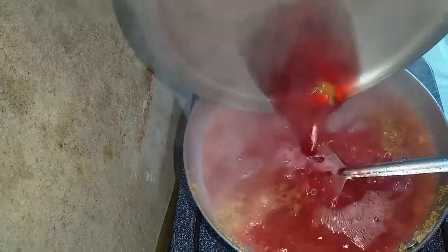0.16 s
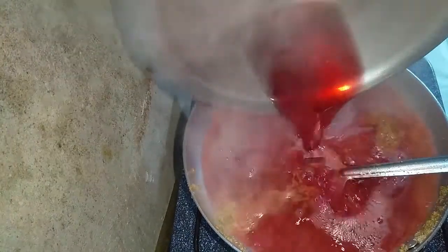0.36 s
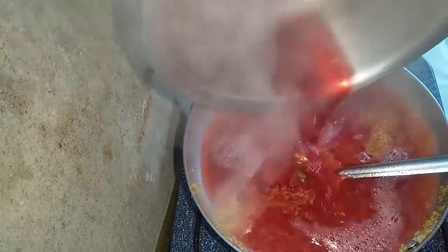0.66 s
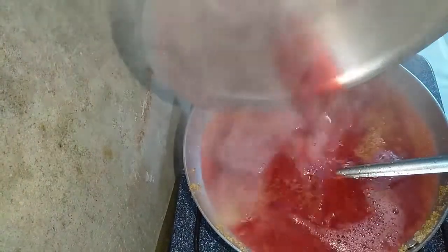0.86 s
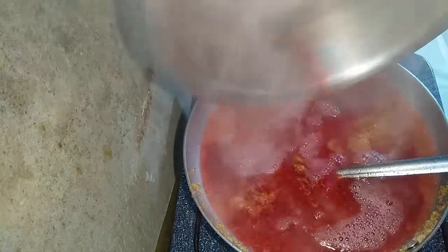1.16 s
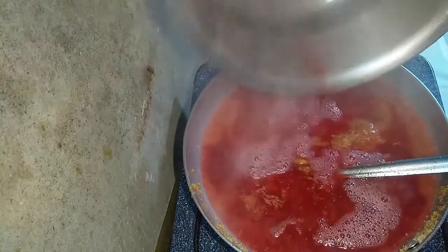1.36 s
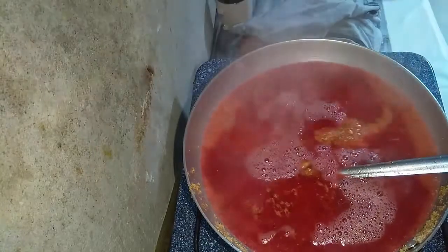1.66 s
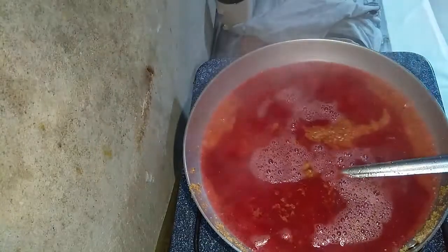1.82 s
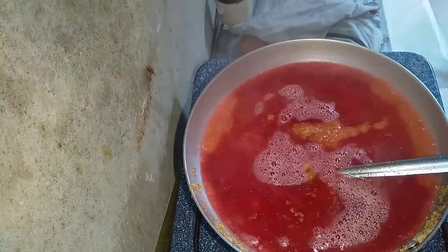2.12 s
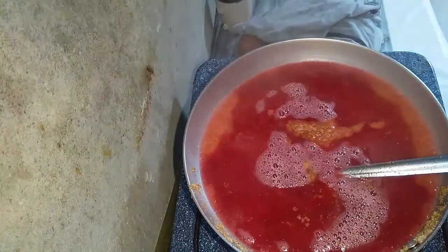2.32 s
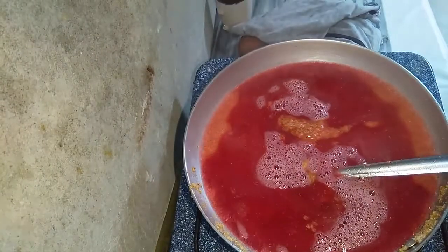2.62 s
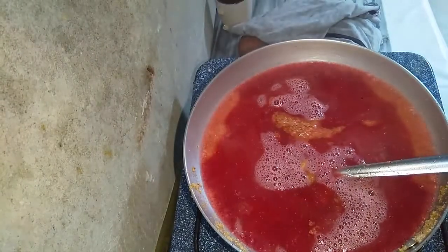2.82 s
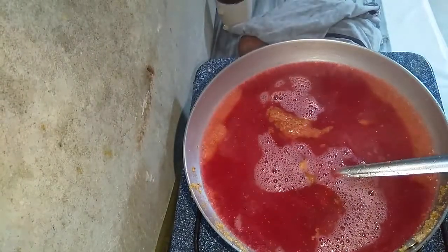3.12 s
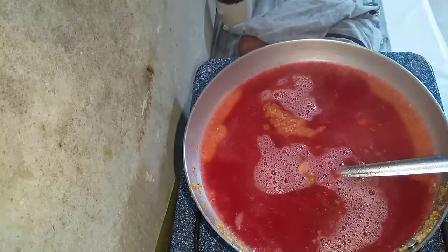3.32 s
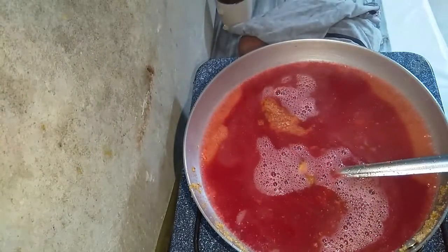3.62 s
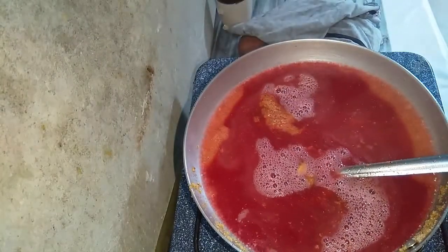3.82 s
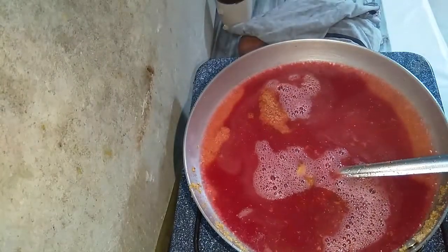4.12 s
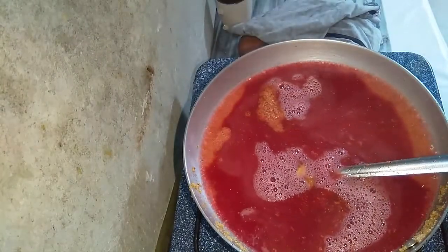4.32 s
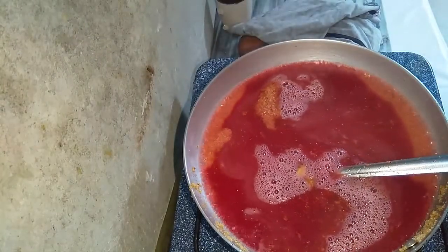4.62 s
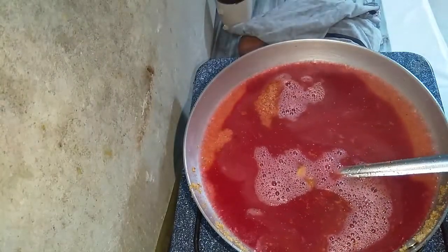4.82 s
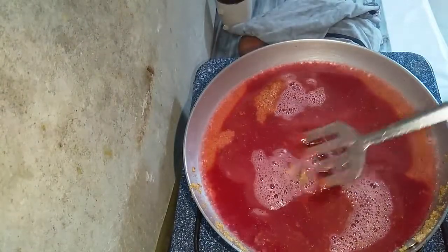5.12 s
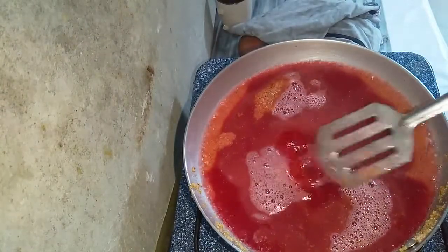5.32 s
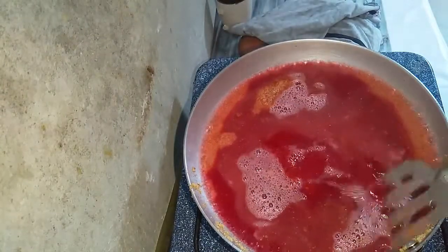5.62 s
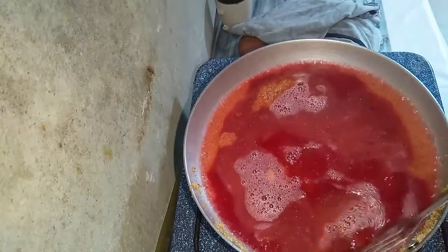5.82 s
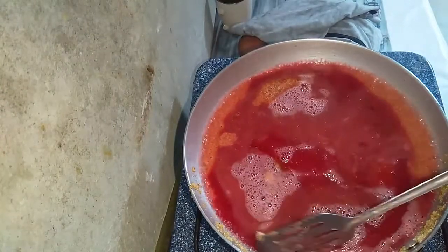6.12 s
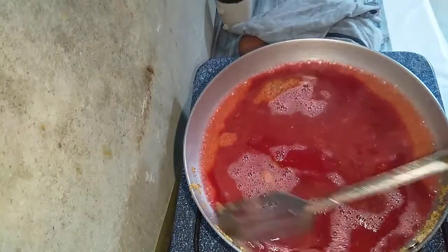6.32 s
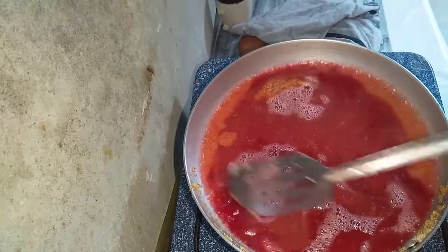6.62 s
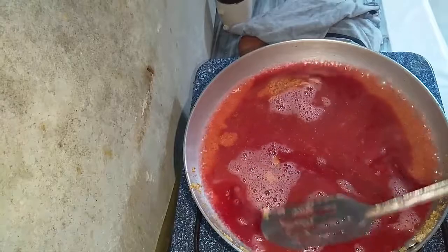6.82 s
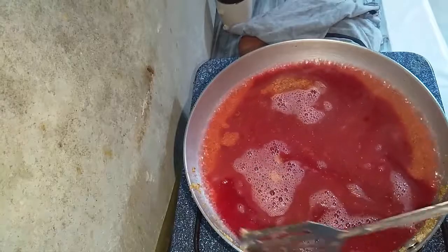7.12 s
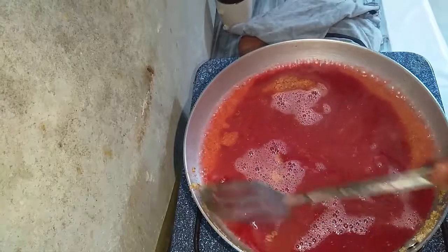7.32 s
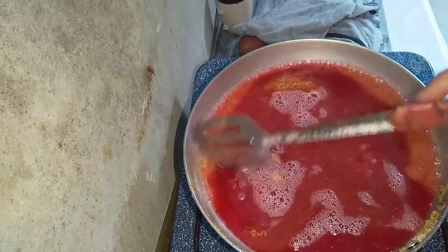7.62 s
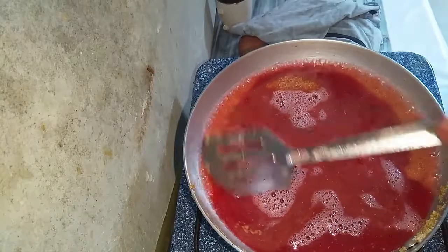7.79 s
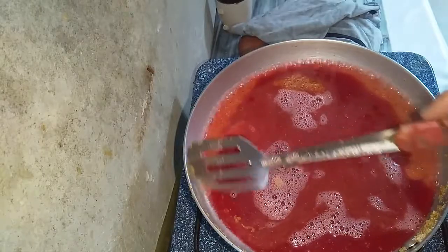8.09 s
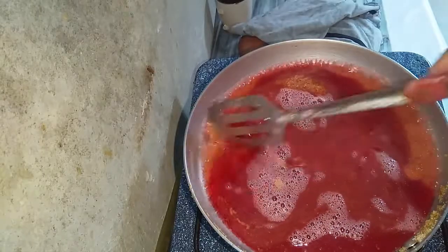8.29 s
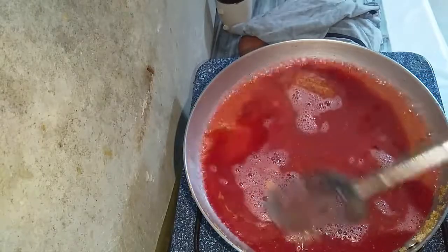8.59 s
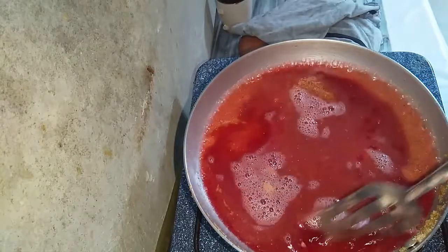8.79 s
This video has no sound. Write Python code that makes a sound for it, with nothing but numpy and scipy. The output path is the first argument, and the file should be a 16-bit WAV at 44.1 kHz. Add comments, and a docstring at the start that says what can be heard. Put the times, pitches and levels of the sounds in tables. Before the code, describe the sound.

In a small kitchen, syrup streams into a hot pan with a loud bright sizzle, low plunging rumble and brief gurgling bubbles. The pour stops and the hiss slowly weakens. An empty steel pot is set down with a hollow rocking clunk, then a spatula knocks, scrapes and stirs the thick liquid. A faint stove hum lies underneath. Close stereo pickup.

```python
"""Hot syrup over roasted semolina

Syrup is poured into a hot pan: thousands of tiny clicks make a dense sizzle that dies away as it cools.
An empty steel pot is set down, then a spatula knocks, scrapes and judders: fading sine tones and noise.
Under it lie a stove hum (a wavering sine tone) and a low kitchen rumble (filtered noise), all in stereo."""
import sys
import numpy as np
from scipy import signal
from scipy.fft import rfft, irfft
from scipy.io import wavfile
from scipy.ndimage import uniform_filter1d, map_coordinates

SR = 44100
rng = np.random.default_rng(int(sys.argv[2]) if len(sys.argv) > 2 else 0)


def generate_wav(sig):
    """Save sig (samples, or channels by samples) to the path in sys.argv[1] as 16-bit PCM at SR."""
    pcm = np.round(np.clip(np.atleast_2d(sig).T, -1, 1) * 32767).astype(np.int16)
    wavfile.write(sys.argv[1], SR, pcm)


N = 394694
TIME = np.arange(N) / SR

# Colour of the sizzle at the left and right port: f/Hz, level per Hz/dB
FIZZ_LEFT_COLOUR = [(2000, -6), (3200, -1), (4200, -3.5), (5600, -6.5), (7000, -4.5), (9000, -2),
                    (10700, 1), (12100, 3), (13300, 2), (14500, -3.5), (17500, -16.5)]
FIZZ_RIGHT_COLOUR = [(2000, -3), (3200, -0.5), (4200, -2), (5600, -7), (7000, -5.5), (9000, -6.5),
                     (10700, -5.5), (12100, -4.5), (13300, -15), (14500, -1), (17500, -12)]
# Fine fizz: level before the pour boost, loss by cooling, boost while syrup flows fully
FIZZ_DB, FIZZ_COOLING_DB_PER_S, FIZZ_POUR_DB = -15.6, 2.05, 5.4
# Coarse sputter: the same three settings
SPUTTER_DB, SPUTTER_COOLING_DB_PER_S, SPUTTER_POUR_DB = -27, 1.5, 6.5
# Syrup reaches a hot spot and the boiling flares: middle t/s, length/s, fizz rise/dB, sputter rise/dB
FLARE_UPS = [(0.584, 0.36, 0.4, 1.3), (1.66, 0.63, 0.6, 3.5), (1.97, 0.33, 1.0, -0.5),
             (3.675, 0.17, 0.3, 4.0), (4.3, 0.27, 1.3, 3), (4.65, 0.12, 1.5, 1.5), (5.366, 0.14, 1, 0.5),
             (5.62, 0.14, 1.5, 6), (6.293, 0.2, 0.1, 2), (6.78, 0.79, 0.7, 1.4), (7.93, 0.12, 2, 1.5),
             (8.575, 0.3, 2.5, 0.6)]
# The sizzle's lower edge at first and at last
EDGE_FIRST_HZ, EDGE_LAST_HZ = 1950, 2560
# When that edge is halfway up, and how gradually it climbs, at each port
EDGE_LEFT_S, EDGE_LEFT_TAPER_S, EDGE_RIGHT_S, EDGE_RIGHT_TAPER_S = 1.5, 0.35, 5.46, 0.62
# Hollow wash of the boiling inside the pan: f/Hz, level per Hz/dB
HOLLOW_COLOUR = [(150, -7), (370, 6), (510, -3.5), (620, 8), (750, -4), (950, 3), (1130, -3), (1400, 1.5),
                 (1720, 1), (2100, 16), (3200, -17.5)]
# Air resonances between the syrup and the rim: f/Hz, width/Hz, level/dB, left minus right/dB
AIR_RESONANCES = [(1154, 90, -5, -1), (1348, 58, -3.5, 0), (1554, 33, -6.5, -2.5)]
# The stream thins: when it is down to half, and how gradually
POUR_HALF_S, POUR_TAPER_S = 0.83, 0.25
# Colour of the plunging stream: f/Hz, level per Hz/dB
PLUNGE_COLOUR = [(15, -8), (40, 0.5), (70, -1), (130, -1.0), (190, -6.5), (280, -25),
                 (600, -35.0), (3000, -58.5)]
# Steam squeezes through the paste: t/s, length/s, f/Hz, level/dB
STEAM_SQUEAKS = [(4.43, 0.057, 3000, -34.5), (4.614, 0.064, 2770, -30.5), (4.745, 0.098, 2700, -40),
                 (6.054, .07, 3440, -35.5), (6.776, 0.067, 2130, -41), (8.56, 0.081, 3160, -36.5)]
# Tone of the pan's base, and of the pan rocking on its stand
BASE_HZ, ROCK_HZ = 358.3, 64.2
# Modes (natural tones) of the filled pan: f/Hz, level/dB, time to fall by 60 dB/s
PAN_MODES = [(ROCK_HZ, -5, 0.57), (177.6, -9, 0.5), (232, 1, 0.15), (272, -9.5, 0.18), (320, -9, 0.11),
             (BASE_HZ, -12.5, 0.163), (359, -28, 0.82), (386, -25, 0.18), (468, -16.5, 0.17),
             (612, -23.5, 0.14), (843, -14.5, .09), (1345, -21, 0.11)]
# Modes of the spatula's steel blade: f/Hz, level/dB, time to fall by 60 dB/s
BLADE_MODES = [(880, 2, 0.082), (2480, -9, 0.054), (2930, -10, 0.14), (3200, -20, .1), (4230, -17, .2),
               (6900, -14, .2), (8030, -6, 0.15), (8650, -9, 0.11), (9150, -5, 0.13)]
# Spatula knocks: t/s, thud level/dB, hardest-driven f/Hz, scrape level/dB, scrape centre f/Hz,
# scrape rise/s, scrape time to fall by 60 dB/s, blade level/dB, left minus right/dB
SPATULA_KNOCKS = [(5.621, -27, 260, -18.5, 2920, 0.0054, 0.25, -51, -7),
                  (5.745, -23.5, 330, -27.5, 2460, 0.0045, 0.2, -45, -9),
                  (6.518, -71, 300, -31, 8000, .002, .03, -62, -1),
                  (6.935, -63, 200, -35, 8000, .002, .03, -59, 0),
                  (7.023, -37.5, 278, -27, 9000, .002, .04, -62, -8),
                  (7.706, -56, 300, -34, 9000, .002, .03, -69, -6),
                  (7.993, -34.5, 190, -63, 1000, .005, .15, -61, -8),
                  (8.714, -40, 600, -26.5, 2640, 0.0033, 0.14, -35, -2),
                  (8.719, -21.5, 320, -18.5, 8200, .0007, 0.014, -29, -9),
                  (8.885, -41, 400, -43, 990, 0.014, .2, -57, -6),
                  (8.912, -32.5, 327, -40.5, 2510, 0.0095, 0.13, -40, -6)]
# Colour of the syrup splash at each knock: f/Hz, level per Hz/dB
SLOSH_COLOUR = [(40, -15), (250, -8), (450, -14), (650, -21.5), (880, -20.5), (1200, -23),
                (3000, -32), (9000, -65)]
# The dragged spatula sticks and slips, driving one mode: t/s, length before fading/s, f/Hz, level/dB
SPATULA_JUDDERS = [(5.629, 0.025, BASE_HZ, -14.5), (5.659, 0.07, BASE_HZ, -20),
                   (5.665, 0.041, ROCK_HZ, -25), (5.744, 0.033, BASE_HZ, -7.7),
                   (5.786, 0.048, BASE_HZ, -15.5), (5.748, 0.033, ROCK_HZ, -28),
                   (6.854, 0.073, 179.3, -36.5), (7.025, 0.087, BASE_HZ, -35), (7.423, 0.2, 61.1, -40.5),
                   (7.766, 0.24, 122.3, -26), (7.829, 0.058, 124.2, -26), (8.022, 0.15, 124.7, -23),
                   (8.198, 0.044, 124.3, -35), (8.733, 0.026, 222, -32), (8.734, 0.048, BASE_HZ, -25),
                   (8.746, 0.056, ROCK_HZ, -32)]
# The spatula pushes through the syrup: middle t/s, length/s, level/dB
STIR_STROKES = [(5.96, 0.16, -51), (6.25, 0.27, -52), (6.95, 0.4, -48.5), (7.163, 0.17, -46),
                (7.65, 0.2, -50), (8.072, 0.44, -43.5), (8.94, 0.22, -44.5)]
# Colour of the churning syrup: f/Hz, level per Hz/dB
CHURN_COLOUR = [(40, -13), (100, -16), (178, 11.0), (230, -8.0), (290, -8.5), (360, -7.0),
                (480, -38), (900, -38.5), (3000, -45)]
# Modes of the empty steel pot: f/Hz, level/dB, time to fall by 60 dB/s
POT_MODES = [(269, -3.5, 0.07), (360, -11.5, 0.055), (419, -6, 0.058), (481, -16, .04), (567, -5.5, 0.051),
             (596, -1, 0.082), (670, -8.5, 0.056), (708, -10, 0.053), (819.5, 2, 0.062), (814, -14.5, .1),
             (1610, -28.5, .06), (1910, -24, .06)]
# The pot bumps and rocks as it is set down: t/s, level/dB, hardest-driven f/Hz
POT_BUMPS = [(3.245, -15, 580), (3.257, -16.5, 464), (3.260, -5.5, 1300), (3.27, -12.5, 534),
             (3.285, -12.5, 885), (3.294, -11, 884), (3.312, -25, 616), (3.350, -32, 860),
             (3.374, -47, 860)]
# Each pot mode radiates in its own direction: f/Hz, left minus right/dB
POT_SIDES = [(270, -13), (420, -14.5), (560, -0.5), (600, -1.5), (690, -10.5), (815, 0), (1900, -2)]
# Stove hum: centre of its wandering pitch, and its level before it wavers or sags
HUM_HZ, HUM_DB = 123.6, -50
# The hum sags briefly: middle t/s, length/s, depth/dB
HUM_DIPS = [(4.85, 1.8, 5.5), (6.7, 0.41, 17.5)]
# Colour of the kitchen rumble: f/Hz, level per Hz/dB
RUMBLE_COLOUR = [(15, 6.5), (40, -2), (62, 3.5), (88, -1.5), (130, 1.5), (180, -5), (260, -23.5),
                 (360, -13.5), (500, -26), (1500, -19), (4000, -44.5)]
# Upper limit of the final sound
CUT_HZ = 15760


def sizzle(fizz_surge_db=0.24, sputter_surge_db=0.55, split_hz=4800, steep=22, cluster_db=0.6,
           sputter_cluster_db=1.03, ring_db=2.03, sputter_ring_db=2.5, flutter_db=0.22):
    """Bursting bubbles: small ones fizz steadily, larger ones sputter in clumps at lower pitch."""
    hz, t, z = signal.stft(pops(), SR, nperseg=512, noverlap=384)
    f = hz[:, None] + 1
    shape = amp([read(FIZZ_LEFT_COLOUR, hz), read(FIZZ_RIGHT_COLOUR, hz)])[:, :, None]
    edge = lower_edge(t)[:, None]
    shape = shape / np.sqrt(1 + np.minimum(edge / f, 10) ** (2 * steep))
    # share of each frequency that counts as coarse; the rest is fine
    coarse = 1 / (1 + (f / split_hz) ** 6)
    fine = 1 - coarse
    fine_db, coarse_db = boiling(t)
    power = (shape ** 2).mean(0)
    surge = np.interp(t, TIME, drift(5))
    fizz = amp(fine_db + fizz_surge_db * surge) ** 2 * fine / (power * fine).mean(0)
    sputter = amp(coarse_db + sputter_surge_db * surge) ** 2 * coarse / (power * coarse).mean(0)
    # clusters of like-sized bubbles come and go; single bubbles ring briefly in narrow bands
    clusters = patches(z.shape[1:], 12, 14)
    rings = patches(z.shape[1:], 2, 9)
    grain_db = clusters * (cluster_db * fine + sputter_cluster_db * coarse)
    grain_db += rings * (ring_db * fine + sputter_ring_db * coarse)
    z = z * shape * np.sqrt(fizz + sputter) * amp(grain_db)
    sound = signal.istft(z, SR, nperseg=512, noverlap=384)[1][:, :N]
    return sound * amp(flutter_db * drift(18))


def pops(per_s=6000, late_per_s=2600, spread_db=1.0, blur=1.0, side_db=3, lead=4, lead_spread=2.5):
    """Tiny steam bubbles click, fewer as the pan cools; added noise blurs them into a smooth hiss."""
    rate = np.interp(TIME, [0, TIME[-1]], [per_s, late_per_s])
    size = amp(spread_db * np.minimum(rng.exponential(1, N), 4)) * rng.choice([-1, 1], N)
    # dividing by the root of the rate keeps the average power even
    clicks = size * (rng.random(N) < rate / SR) / np.sqrt(rate)
    # each bubble sits somewhere else in the pan; most reach the right port a few samples late
    late = np.round(lead + lead_spread * rng.standard_normal(N)).astype(int)
    right = np.bincount((np.arange(N) + late) % N, clicks, N)
    ports = np.array([clicks, right]) * amp(side_db * rng.uniform(-1.2, 1, (2, N)))
    return unit(unit(ports) + blur * rng.standard_normal((2, N)))


def boiling(t):
    """Fizz and sputter strength in dB: fed by the stream, fading as the pan cools, with flare-ups."""
    flow = pouring(t)
    fine = FIZZ_DB - FIZZ_COOLING_DB_PER_S * t + FIZZ_POUR_DB * flow
    coarse = SPUTTER_DB - SPUTTER_COOLING_DB_PER_S * t + SPUTTER_POUR_DB * flow
    for middle_s, length_s, fine_db, coarse_db in FLARE_UPS:
        flare = arch(t, middle_s, length_s)
        fine = fine + fine_db * flare
        coarse = coarse + coarse_db * flare
    return fine, coarse


def lower_edge(t):
    """Lowest frequency of the sizzle at the two ports: it climbs early at the left, late at the right."""
    left = transition(t, EDGE_LEFT_S, EDGE_LEFT_TAPER_S)
    right = transition(t, EDGE_RIGHT_S, EDGE_RIGHT_TAPER_S)
    return EDGE_FIRST_HZ + (EDGE_LAST_HZ - EDGE_FIRST_HZ) * np.array([left, right])


def wash(level_db=-51, follow=0.97, flutter_db=1.8):
    """The boiling also sounds the hollow of the pan, as a soft, smooth wash."""
    fine_db, coarse_db = boiling(TIME)
    strength_db = (fine_db + coarse_db) / 2
    swing_db = follow * (strength_db - strength_db.mean())
    source = rng.standard_normal((2, N))
    # each port hears a little of the other
    hollow = colour(source + 0.17 * source[::-1], HOLLOW_COLOUR)
    return hollow * amp(level_db + swing_db + flutter_db * drift(12))


def gurgle(surge_db=3.5, level_db=-22, follow=1.13, pour_db=6.0):
    """Large bubbles ring the air inside the rim in surges that follow the sputter and the stream."""
    source = pops()
    out = np.zeros((2, N))
    for hz, width_hz, db, balance_db in AIR_RESONANCES:
        # two passes narrow the band, so each is set wider
        band = signal.iirpeak(hz, hz / (1.7 * width_hz), SR)
        tone = unit(signal.lfilter(*band, signal.lfilter(*band, source)))
        out += panned(tone, balance_db) * amp(db + surge_db * drift(14))
    return out * amp(level_db + follow * boiling(TIME)[1] + pour_db * pouring(TIME))


def pour(level_db=-44, flow_power=0.4, balance_db=-2):
    """The stream plunges into the pan with a soft, low rumble that follows its flow."""
    source = rng.standard_normal((2, N)) + .5 * rng.standard_normal(N)
    plunge = colour(source, PLUNGE_COLOUR)
    return panned(plunge * amp(level_db) * pouring(TIME) ** flow_power, balance_db)


def pouring(t):
    """Flow of the stream, easing from nearly 1 (full) towards 0."""
    return 1 - transition(t, POUR_HALF_S, POUR_TAPER_S)


def bubbles(count=150, level_db=-43, spread_db=6.0, low_hz=190, high_hz=1700, cycles=9, glide=0.045,
            settle_s=1.5, fade_db_per_s=5):
    """Air carried under by the stream rings in short, rising blips that grow rare and faint."""
    out = np.zeros((2, N))
    t = np.arange(SR // 8) / SR
    for when, pitch, size, side in rng.random((count, 4)):
        s = min(-settle_s * np.log(1 - when), TIME[-1])
        hz = low_hz * (high_hz / low_hz) ** np.sqrt(pitch)
        turns = hz * t
        tone = np.sin(2 * np.pi * turns * (1 + glide * np.tanh(turns / cycles / 4)))
        blip = tone * np.exp(-turns / cycles) * np.minimum(turns / 2, 1)
        blip_db = level_db + spread_db * (2 * size - 1.5) - fade_db_per_s * s
        add(out, s, panned(blip * amp(blip_db), 8 * (side - .5)))
    return out


def squeaks(width_hz=130):
    """Escaping steam whistles briefly in a narrow, fuzzy band."""
    out = np.zeros((2, N))
    for s, length_s, hz, db in STEAM_SQUEAKS:
        noise = rng.standard_normal((2, SR // 4))
        band = unit(signal.lfilter(*signal.iirpeak(hz, hz / width_hz, SR), noise))
        window = np.sqrt(np.hanning(min(int(length_s * SR), SR // 4)))
        add(out, s, amp(db) * band[:, :len(window)] * window)
    return out


def knocks(skirt_db=-22, slosh_db=-15, slosh_t60=0.4):
    """The spatula meets the pan: a dull thud, a syrup splash, a gritty scrape and a ringing blade."""
    out = np.zeros((2, N))
    t = np.arange(SR // 2) / SR
    for s, db, hz, scrape_db, scrape_hz, rise_s, t60, blade_db, balance_db in SPATULA_KNOCKS:
        scrape_colour = [(scrape_hz / 10, -40), (scrape_hz / 2, skirt_db), (scrape_hz * 0.8, 0),
                         (scrape_hz * 1.16, 0), (scrape_hz * 2, skirt_db), (scrape_hz * 10, -40)]
        scrape = colour(rng.standard_normal((2, len(t))), scrape_colour)
        scrape *= amp(scrape_db) * fall(t - rise_s, t60) * np.minimum(t / rise_s, 1)
        slosh = colour(rng.standard_normal(len(t)), SLOSH_COLOUR)
        slosh *= amp(slosh_db) * fall(t, slosh_t60) * np.minimum(t / 0.0035, 1)
        thud = ring(PAN_MODES, s, hz, focus_octaves=1.24, rise_s=0.022)
        blade = ring(BLADE_MODES, s, 2500, focus_octaves=4, rise_s=0.0031)
        hit = scrape + amp(db) * (thud + slosh) + amp(blade_db) * blade
        add(out, s, panned(hit, balance_db))
    return out


def ring(modes, s, centre_hz, focus_octaves, rise_s):
    """A cushioned blow: modes near the centre frequency swell most, then each dies away."""
    t = np.arange(SR // 2) / SR
    hz, db, t60 = np.transpose(modes)[:, :, None]
    drive = np.exp(-.5 * (np.log2(hz / centre_hz) / focus_octaves) ** 2)
    swell = np.sin(np.pi / 2 * np.minimum(t / rise_s, 1)) ** 2
    tones = drive * amp(db) * fall(t - rise_s, t60) * np.sin(2 * np.pi * hz * (t + s))
    return swell * tones.sum(0)


def judders(grip_s=0.0081, release_s=0.018, rough=0.22, waver=0.16, balance_db=-1):
    """While the blade drags, one mode of the pan is kept ringing, uneven in strength and pitch."""
    out = np.zeros(N)
    t = np.arange(SR // 2) / SR
    slip = waver * drift(45.5)[:len(t)]
    for s, length_s, hz, db in SPATULA_JUDDERS:
        # the swell takes at least four cycles
        swell = np.sin(np.pi / 2 * np.minimum(t / max(grip_s, 4 / hz), 1)) ** 2
        fade = np.exp(-np.maximum(t - length_s, 0) / release_s)
        add(out, s, amp(db) * swell * fade * np.sin(2 * np.pi * hz * (t + s) + slip))
    return panned(out * (1 + rough * drift(45)), balance_db)


def stir(lumps_db=3, balance_db=-3):
    """Thick syrup churns around the blade in dull lumps, swelling with each stroke."""
    churn = colour(rng.standard_normal(N), CHURN_COLOUR)
    push = sum(amp(db) * arch(TIME, middle_s, length_s) for middle_s, length_s, db in STIR_STROKES)
    return panned(churn * push * amp(lumps_db * drift(23)), balance_db)


def pot(left_late_s=0.00017):
    """The empty pot touches down and rocks, a little to the right, so the left port hears it later."""
    out = np.zeros((2, N))
    modes = np.array(POT_MODES)
    balance_db = read(POT_SIDES, modes[:, 0])
    for port, side, late_s in ((out[0], .5, left_late_s), (out[1], -.5, 0)):
        # only the level column changes with the side
        heard = modes + np.outer(side * balance_db, [0, 1, 0])
        for s, db, hz in POT_BUMPS:
            add(port, s + late_s, amp(db) * ring(heard, s, hz, focus_octaves=0.35, rise_s=0.0094))
    return out


def stove(rumble_db=-53.5, balance_db=-8, rumble_balance_db=-4.5):
    """A hum that wavers slightly and sags briefly, over the low rumble of the kitchen."""
    turns = np.cumsum(HUM_HZ + 0.36 * drift(1.8)) / SR
    waver_db = 1.1 * drift(3)
    sag_db = sum(db * arch(TIME, middle_s, length_s) for middle_s, length_s, db in HUM_DIPS)
    # the root of 2 gives the sine an rms of 1
    hum = np.sqrt(2) * np.sin(2 * np.pi * turns) * amp(HUM_DB - sag_db + waver_db)
    source = rng.standard_normal((2, N)) + 0.54 * rng.standard_normal(N)
    rumble = colour(source, RUMBLE_COLOUR) * amp(rumble_db)
    return panned(hum, balance_db) + panned(rumble, rumble_balance_db)


def kitchen(x, t60=0.48, wet_db=-20):
    """Hard, near walls add a short tail: fading noise, convolved with the sound."""
    t = np.arange(SR // 2) / SR
    tail = rng.standard_normal((2, len(t))) * fall(t, t60) * np.minimum(t / 0.0167, 1)
    echo = signal.fftconvolve(x, tail / np.linalg.norm(tail[0]), axes=1)[:, :N]
    return x + amp(wet_db) * echo


def amp(db):
    """Decibels to gain."""
    return 10 ** (np.asarray(db) / 20)


def unit(x):
    """Scales to rms (average strength) 1."""
    return x / np.sqrt(np.mean(x ** 2) + 1e-20)


def read(points, hz):
    """Reads dB values between listed points, joined on a log-frequency axis."""
    f, db = np.transpose(points)
    return np.interp(np.log(hz + 1), np.log(f), db)


def colour(x, points):
    """Filters x by a spectrum; rms 1."""
    length = x.shape[-1]
    gain = amp(read(points, np.fft.rfftfreq(length, 1 / SR)))
    return unit(irfft(rfft(x) * gain, length))


def drift(rate_hz):
    """A smooth random curve of rms 1, through two random points per cycle of the rate."""
    knots = rng.standard_normal(N // 50)
    return unit(map_coordinates(knots, [TIME * rate_hz * 2], order=2, mode="wrap"))


def patches(shape, bins, frames):
    """Random blotches over frequency and time, rms 1."""
    blurred = uniform_filter1d(rng.standard_normal(shape), bins, axis=0)
    return unit(uniform_filter1d(blurred, frames, axis=1))


def fall(t, t60):
    """Decay from 1, by 60 dB in t60 seconds; stays at 1 before time 0."""
    return np.exp(-np.log(1000) * np.maximum(t, 0) / t60)


def transition(t, half_s, taper_s):
    """A smooth step from 0 to 1."""
    return .5 + .5 * np.tanh((t - half_s) / (2 * taper_s))


def arch(t, middle_s, length_s):
    """A smooth swell from 0 to 1 and back."""
    return np.cos(np.pi * np.clip((t - middle_s) / length_s, -.5, .5)) ** 2


def add(mix, s, sound):
    """Adds a sound at time s, in seconds."""
    part = mix[..., round(s * SR):][..., :sound.shape[-1]]
    part += sound[..., :part.shape[-1]]


def panned(x, balance_db):
    """Spreads a sound over the two ports; a positive balance makes the left one louder."""
    return x * amp(np.array([[.5], [-.5]]) * balance_db)


def scene():
    """The pour, the boiling pan, the pot and the stove, with the spatula ringing in the room."""
    boil = sizzle() + wash() + gurgle() + bubbles() + squeaks()
    spatula = kitchen(knocks() + judders() + stir())
    return pour() + boil + stove() + pot() + spatula


def record(dry):
    """Clips at full scale, then steeply removes what lies above the upper limit."""
    low_pass = signal.firwin(801, CUT_HZ, window=("kaiser", 8), fs=SR)
    return signal.oaconvolve(np.clip(dry, -1, 1), low_pass[None], "same", axes=1)


dry = scene()
out = record(dry)
generate_wav(out)
```